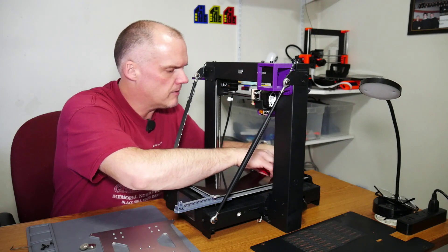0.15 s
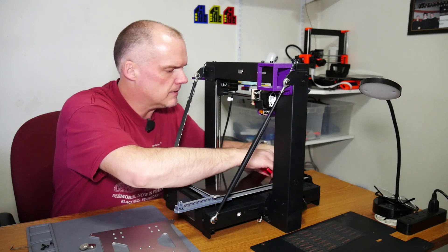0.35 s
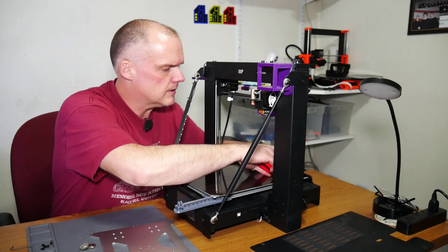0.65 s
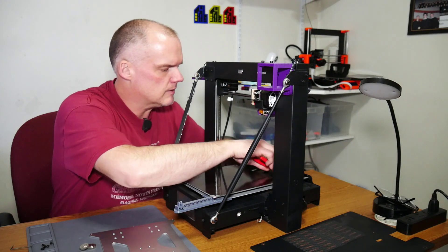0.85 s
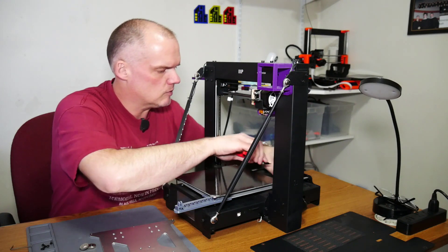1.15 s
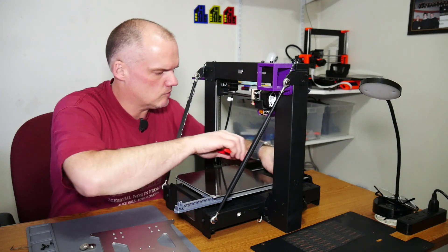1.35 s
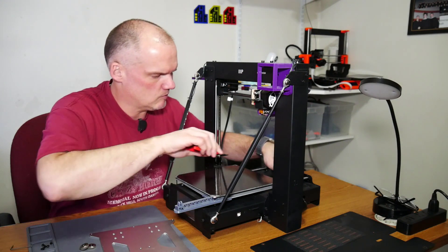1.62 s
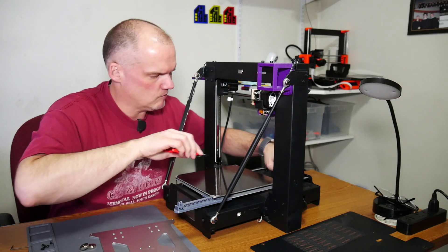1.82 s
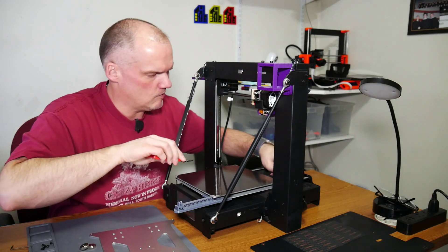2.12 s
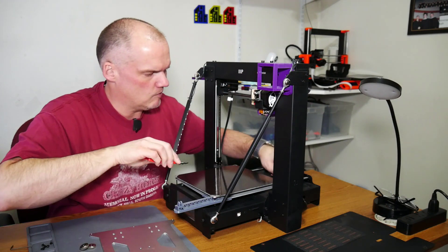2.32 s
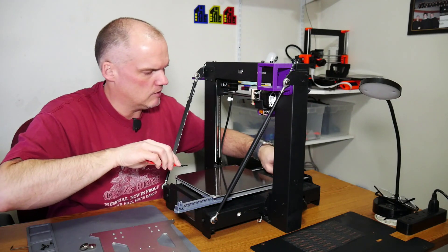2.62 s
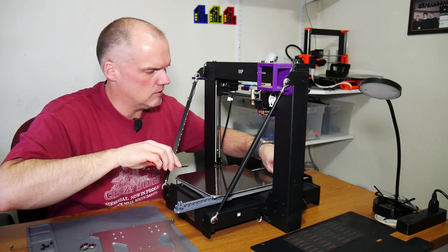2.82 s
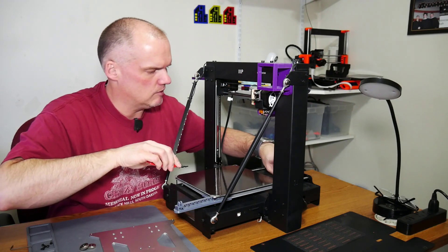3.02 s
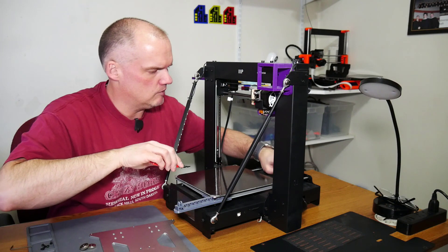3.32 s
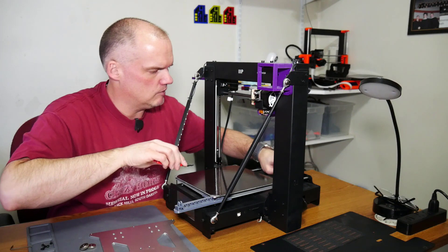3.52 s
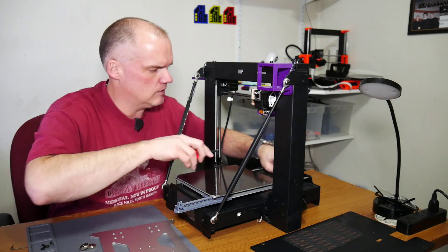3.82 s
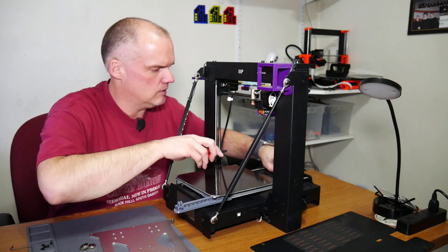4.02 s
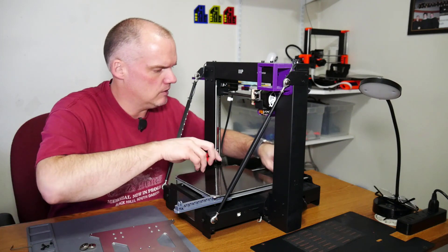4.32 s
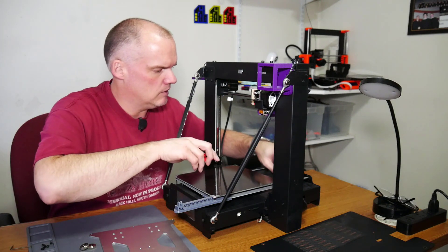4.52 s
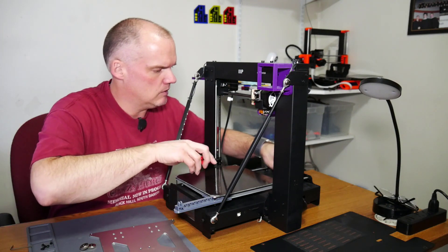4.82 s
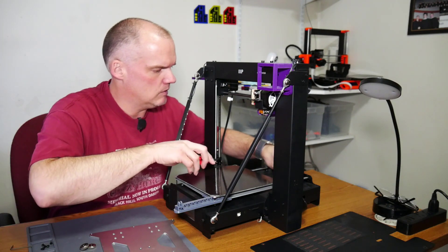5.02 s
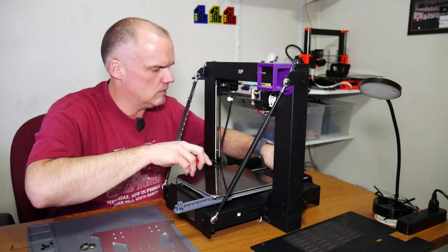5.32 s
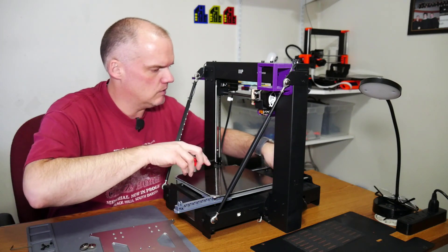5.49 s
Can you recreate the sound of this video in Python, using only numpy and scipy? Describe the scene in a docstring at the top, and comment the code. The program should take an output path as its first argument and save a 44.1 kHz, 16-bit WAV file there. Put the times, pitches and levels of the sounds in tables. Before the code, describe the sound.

Close lapel microphone in a small, quiet workroom. Faint hiss, low shirt rumble and tiny ticks lead to one loud, crisp cutter snap through a nylon tie at half a second, with a short ring from a metal frame. A few bright tool clicks follow, then much quieter wire rustling, soft bumps, small scrapes and sparse ticks to the end.

```python
"""Low cloth rumble, hiss, a soft rub and faint ticks; then flush cutters snap a nylon zip tie on a metal frame.
The snip is a pop, a jaw pulse and noise; decaying sines ring the frame and noise bands answer as the room.
Hands then work among wires: decaying noise bands make ticks and knocks, trains of tiny slips make scrapes
and rustle, short sines make squeaks and one ringing tap. A lapel microphone in a small workroom hears it,
with its shirt's rumble (shaped noise, slips, slow swings) and its own hiss (shaped noise)."""
import sys
import numpy as np
from scipy import signal
from scipy.fft import rfft, irfft
from scipy.io import wavfile

SR = 44100
rng = np.random.default_rng(int(sys.argv[2]) if len(sys.argv) > 2 else 0)


def materialize(psi):
    """Save the field psi as 16-bit PCM at rate SR to the path in sys.argv[1].

    A 1-D psi becomes a single channel; in a 2-D psi each row is a channel.
    """
    bounded = np.clip(np.atleast_2d(psi).T, -1, 1)
    quanta = np.round(bounded * 32767).astype(np.int16)
    wavfile.write(sys.argv[1], SR, quanta)


N = 249242
TIME_S = np.arange(N) / SR
RING_TIME_S = TIME_S[:SR * 3 // 5]  # time since a blow

SNIP_S = .4872
STROKE_ATTACK_S, STROKE_RELEASE_S = 0.024, 0.018  # release is a time constant
RESTING_DULL_DB, RESTING_DRY_DB = -70.5, -73.5  # hands never quite still; before the rub trims
HISS_DB = -62
TOP_HZ = 15900

# Levels in the tables are relative; the functions set the mix.
# Clatter of jaws and tie after the cut: band_hz, level_db
CLATTER_BANDS = [(130, -32), (300, -34), (700, -31), (1150, -30.5), (1700, -22.5), (2700, -22), (4000, -25),
                 (5200, -22), (6500, -19.5), (8200, -36), (10500, -28.5), (14000, -35.5)]
# Room's answer to the cut: band_hz, level_db, t60_s
ROOM_BANDS = [(128, -51, .45), (285, -40, 0.36), (699, -39.5, 0.36), (1150, -38.5, .3),
              (2010, -37.5, 0.303), (3000, -35.5, 0.27), (4297, -37, .3), (6018, -37, 0.279),
              (8730, -41.5, .28), (13000, -48, .28)]
# Modes of the metal frame: mode_hz, level_db, t60_s
FRAME_MODES = [(260.1, -6, 0.46), (295, -9.5, 0.14), (331, -4, 0.32), (412, -8, 0.21), (492.2, 2, .27),
               (628, 2, 0.27), (680, -11.5, 0.23), (711, 3.5, .1), (797, -6, 0.34), (873, -6, .15),
               (965.6, -1.5, 0.2), (1028, -3, 0.25), (1136, 3, 0.086), (1320, -13, .24), (1634, 1.5, 0.15),
               (1675, -4.5, .16), (2040, 0.5, 0.24), (2084, 2, 0.16), (2440, -14, 0.26),
               (2750, -12.5, 0.34), (2864, -6.5, 0.22), (3155, -14.5, .3), (3350, -15, .3),
               (3884, -11, 0.18), (4438, -2.5, 0.15), (4856, -3, .16), (5870, 0, 0.11)]
# Ticks of nylon, wire and tool: start_s, level_db, body_db, top_db, t60_s
TICK_EVENTS = [(0.413, -54, -8, -10, 0.023), (.428, -51, -23, -16, 0.03), (0.4442, -40, -16, -12, 0.03),
               (0.5712, -39, -1, -24, 0.024), (.5937, -20, -11, -23, 0.0078), (0.5959, -24, -8, -24, 0.019),
               (.7025, -51, -16, -21, .014), (0.7109, -33.5, -16, -13, 0.03), (1.199, -42, -9, -9.5, 0.022),
               (1.331, -56, -15, -12, 0.023), (1.6026, -43, -5, -13, 0.036),
               (1.859, -31, -13.5, -13, 0.012), (1.8664, -30, -9.5, -9, 0.027),
               (1.9428, -31.5, -6.5, -12, 0.012), (1.959, -48.5, -11, -8, 0.058),
               (2.179, -50.5, -3, -25, 0.046), (2.2321, -53, 4.5, -6, 0.025), (3.0477, -43, -4, -14, 0.013),
               (3.0933, -49, -16, -3.5, 0.023), (3.8255, -43.5, -3.5, -4.5, 0.028),
               (4.2908, -46, -5, -15.5, 0.069), (4.3147, -47.5, -1.5, -10, 0.028),
               (4.393, -56, 5.5, -17, 0.038), (4.775, -53, -5, -24, .035), (4.8774, -53.5, -14, -13, 0.035),
               (4.9879, -42, -4, -11, 0.043), (5.008, -58, 7, -19.5, 0.018), (5.1352, -48, 6, -25, 0.014)]
# Ring of a tick: band_hz, level_db
TICK_RING_BANDS = [(3200, -14.5), (4000, -15), (4800, -5), (5800, -6.5), (6900, -7.5)]
# Body of a tick: band_hz, level_db
TICK_BODY_BANDS = [(450, -11.5), (800, -8), (1300, -8.5), (2100, -6.5)]
# Top of a tick: band_hz, level_db
TICK_TOP_BANDS = [(8300, 1.5), (10500, -5), (13300, -9)]
# Soft bumps of fingers and wire bundles: start_s, level_db, t60_s
KNOCK_EVENTS = [(0.3818, -47.5, 0.036), (1.0415, -53.5, 0.025), (1.198, -59.5, 0.054), (1.7127, -50, 0.075),
                (3.046, -44, 0.044), (5.135, -45, 0.07), (5.518, -50.5, .04), (5.538, -47.5, 0.07)]
# Ring of a bump: band_hz, level_db
KNOCK_BANDS = [(330, -13.5), (520, -11), (850, -5), (1350, -9.5), (2000, -19.5)]
# Wires dragged over the frame: peak_s, level_db, rise_s, fall_s, treble_db (rise, fall: time constants)
SCRAPE_EVENTS = [(0.712, -44, 0.0095, 0.006, -21), (0.86, -60, 0.048, 0.068, 8),
                 (1.47, -56, 0.0072, 0.0054, -24), (2.194, -46.5, 0.0066, 0.02, -12),
                 (2.355, -56, 0.0034, 0.01, -2), (3.97, -59, 0.0097, 0.021, -4),
                 (4.475, -52.5, 0.017, 0.022, -1), (5.142, -47, 0.021, 0.022, -5),
                 (5.527, -38.5, 0.0081, 0.029, -2)]
# Spectrum of a scrape: freq_hz, level_db
SCRAPE_SPECTRUM = [(200, -11.5), (440, -17.5), (500, 11.5), (570, -29), (740, -4), (900, 3.5), (1400, -9),
                   (1950, -8), (2900, -19.5), (4250, -10), (5200, -15), (7000, -17), (9000, -29),
                   (14000, -38)]
# Strokes of hand and sleeve among wires: start_s, length_s, level_db, dry_over_dull_db
STROKE_EVENTS = [(0.171, 0.094, -61, -7), (.36, 0.054, -63, -9), (0.805, .15, -54, -11),
                 (1.015, 0.24, -61, -7.5), (1.317, 0.052, -58.5, -5.5), (1.436, .06, -61.5, -11),
                 (1.686, 0.066, -59, -2), (1.828, 0.14, -58, -1.5), (2.071, 0.26, -60.5, 0),
                 (2.529, 0.16, -64.5, 1.5), (2.737, .22, -62, -1), (2.944, 0.34, -61, -3.5),
                 (3.257, .17, -66, -0.5), (3.65, 0.097, -67, 0), (3.929, 0.13, -62, -1),
                 (4.139, 0.26, -63.5, 0.5), (4.409, 0.18, -61, -9), (4.709, 0.042, -57, -12),
                 (4.845, 0.052, -61.5, -2.5), (5.106, 0.12, -57.5, -7.5), (5.517, 0.1, -55.5, -6)]
# Spectrum of sleeves rubbing: freq_hz, level_db
DULL_RUB_SPECTRUM = [(180, -15), (262, -1.5), (350, -3.5), (440, -2), (500, 9), (560, -3), (640, -1),
                     (850, -5.5), (1200, -23.5), (3000, -49.5)]
# Spectrum of fingers on insulation: freq_hz, level_db
DRY_RUB_SPECTRUM = [(500, -48.5), (800, -1), (1050, 5.5), (1400, 0), (2000, -7), (2600, -13), (5000, -15),
                    (12000, -17.5)]
# Insulation squeaking on insulation: centre_s, level_db, pitch_hz, glide_hz_per_s, half_length_s
SQUEAK_EVENTS = [(3.522, -60.5, 2810, 12996, 0.0087), (4.914, -57.5, 6700, 0, 0.0055)]
# Level of the shirt's sway: time_s, level_db
SWAY_CURVE = [(0.0, -60.5), (0.58, -48.5), (0.69, -58.5), (2.09, -49.5), (2.6, -63), (2.85, -41.5),
              (2.91, -63), (2.99, -53), (3.76, -59.5), (3.79, -69), (4.19, -49.5), (4.26, -62), (4.85, -61),
              (4.88, -51.5), (5.4, -61.5), (5.46, -46.5), (5.49, -65.5), (5.65, -45)]
# Level of the cloth's flutter: time_s, level_db
FLUTTER_CURVE = [(0.0, -68.5), (0.44, -51.5), (0.71, -62.5), (0.94, -58), (2.12, -61), (2.42, -67),
                 (3.11, -60.5), (3.79, -69.5), (4.69, -68), (5.05, -65.5), (5.49, -68.5), (5.65, -71)]
# Soft tugs on the microphone: centre_s, level_db, pitch_hz
TUG_EVENTS = [(0.41, -38.5, 85), (1.0, -41, 120), (1.069, -42, 130), (1.436, -40.5, 111),
              (1.641, -40, 45.4), (2.108, -42, 42), (2.842, -37.5, 43), (3.122, -41, 37.8),
              (3.23, -45, 140), (3.449, -44.5, 34.7), (3.571, -43, 44.4), (5.452, -41, 55.4)]
# Spectrum of the hiss common to both channels: freq_hz, level_db
HISS_SPECTRUM = [(15, -33.5), (25, 0.5), (50, -5.5), (107, -10.5), (267, -9.5), (322, -19), (433, -15.5),
                 (495, -12), (582, -24), (970, -26), (2230, -23.5), (13200, -25), (15500, -28.5)]
# Spectrum of the hiss opposite in the two channels: freq_hz, level_db
SIDE_HISS_SPECTRUM = [(30, -5), (250, -3.5), (1000, -7), (3000, -11.5), (8000, -7.5), (14000, -7.5)]


def snip(ring, jaw_hz=5950, jaw_db=-3, jaw_s=0.00037, pop_db=-11, pop_s=0.00017,
         clatter_t60_s=0.03, frame_db=-31.0):
    """The tie parts with a pressure pop, the jaws slam shut, and frame and room ring on."""
    t = RING_TIME_S - .0007
    jaws = undb(jaw_db) * np.exp(-(t / jaw_s) ** 2 / 2) * np.cos(2 * np.pi * jaw_hz * t)
    pop = -undb(pop_db) * t / pop_s * np.exp((1 - (t / pop_s) ** 2) / 2)
    crack = burst([(2500, -17.5), (4200, -17.5), (9000, -16), (13000, -19)], 0.0054)
    out = np.zeros(N)
    add(out, SNIP_S, jaws + pop + crack)

    build = 1 - np.exp(-RING_TIME_S / .002)  # frame and walls answer a moment later
    clumps = catching(450, 5)[:len(RING_TIME_S)]
    room_t60_s = np.array(ROOM_BANDS)[:, 2]
    room = clumps * burst(ROOM_BANDS, room_t60_s)
    add(out, SNIP_S, build * (undb(frame_db) * ring + room))
    add(out, SNIP_S + .0018, burst(CLATTER_BANDS, clatter_t60_s))
    return out


def frame_ring():
    """A blow excites the frame's modes, each a decaying sine of random phase."""
    out = 0
    for hz, db, t60_s in FRAME_MODES:
        cycles = hz * RING_TIME_S + rng.random()
        out = out + undb(db) * fade(t60_s) * np.sin(2 * np.pi * cycles)
    return out


def ticks():
    """Short bright contacts ring in noise bands, each with its own share of body and top."""
    out = np.zeros(N)
    for start_s, db, body_db, top_db, t60_s in TICK_EVENTS:
        tick = burst(TICK_RING_BANDS, t60_s)
        tick = tick + undb(body_db) * burst(TICK_BODY_BANDS, 1.6 * t60_s)
        tick = tick + undb(top_db) * burst(TICK_TOP_BANDS, 0.83 * t60_s)
        add(out, start_s, undb(db) * tick)
    return out


def tap(start_s=4.989, tap_db=-50, hz=2030, rattle_db=8):
    """One tick catches the frame and leaves a short, rattling note, which a finger soon damps."""
    note = np.exp(-(RING_TIME_S / .022) ** 2) * np.sin(2 * np.pi * hz * RING_TIME_S)
    out = np.zeros(N)
    add(out, start_s, undb(tap_db) * note)
    return out * catching(400, rattle_db)


def knocks():
    """Soft contacts ring mostly low, in decaying noise bands."""
    out = np.zeros(N)
    for start_s, db, t60_s in KNOCK_EVENTS:
        add(out, start_s, undb(db) * burst(KNOCK_BANDS, t60_s))
    return out


def scrapes():
    """Each drag is a swell of friction slips with its own share of treble."""
    grain = colour(slips(4000, 1.9), SCRAPE_SPECTRUM) * catching(300, 5.3)
    dull = signal.sosfiltfilt(signal.butter(2, 2200, fs=SR, output="sos"), grain)
    treble = grain - dull
    out = np.zeros(N)
    for peak_s, db, rise_s, fall_s, treble_db in SCRAPE_EVENTS:
        swell = np.exp(-np.maximum((peak_s - TIME_S) / rise_s, (TIME_S - peak_s) / fall_s))
        out += undb(db) * swell * (dull + undb(treble_db) * treble)
    return out


def squeaks():
    """Two wires slide with brief, slightly rough whistles: gliding sines in a bell-shaped envelope."""
    out = np.zeros(N)
    for centre_s, db, hz, glide_hz_per_s, half_length_s in SQUEAK_EVENTS:
        t = TIME_S - centre_s
        whistle = np.sin(2 * np.pi * (hz + glide_hz_per_s * t / 2) * t)
        out += undb(db) * np.exp(-(t / half_length_s) ** 2) * whistle
    return out * catching(500, 7)


def rustle(dull_db=0.5, dry_db=0, catch_db=6.0):
    """Sleeves rub dully, fingers on insulation more dryly; both catch and slide together."""
    dull, dry = undb(RESTING_DULL_DB), undb(RESTING_DRY_DB)
    for start_s, length_s, db, dryness_db in STROKE_EVENTS:
        speed = undb(db) * stroke(start_s, length_s)
        dull = np.maximum(dull, speed)
        dry = np.maximum(dry, undb(dryness_db) * speed)
    rub = undb(dull_db) * dull * colour(slips(1500, 1.7), DULL_RUB_SPECTRUM)
    rub += undb(dry_db) * dry * colour(slips(1400, 2.6), DRY_RUB_SPECTRUM)
    return rub * catching(160, catch_db)


def stroke(start_s, length_s):
    """A hand gathers speed, slides, and comes to rest."""
    rise = np.clip((TIME_S - start_s) / STROKE_ATTACK_S, 0, 1)
    return rise * np.exp(-np.maximum(TIME_S - start_s - length_s, 0) / STROKE_RELEASE_S)


def shirt(sway_db=0, flutter_db=3, lurch_db=3):
    """Cloth sways in lurches, flutters by slips, and at times tugs the capsule through one slow swing."""
    sway = undb(np.interp(TIME_S, *np.transpose(SWAY_CURVE))) * catching(16, lurch_db)
    flutter = undb(np.interp(TIME_S, *np.transpose(FLUTTER_CURVE)))
    rumble = colour(rng.standard_normal(N),
                    [(10, -18.5), (24, -1.0), (40, 0.0), (62, -8), (100, -22), (300, -56)])
    flap = colour(slips(500, 4.1), [(50, -13.5), (110, 2.0), (170, 0), (280, -4.5), (400, -13.5),
                                    (1000, -41.5), (3000, -66.5)])
    out = undb(sway_db) * sway * rumble + undb(flutter_db) * flutter * flap
    for centre_s, db, hz in TUG_EVENTS:
        swing = np.pi * hz * (TIME_S - centre_s)
        out -= undb(db) * np.cos(2 * swing) * np.exp(-swing ** 2 / 4)
    return out


def slips(rate_hz, spread_db):
    """Friction: tiny slips of uneven size and either sign at random moments."""
    hits = rng.random(N) < rate_hz / SR
    size = undb(spread_db * np.minimum(rng.exponential(size=N), 4))
    return hits * rng.choice([-1, 1], N) * size


def catching(rate_hz, depth_db):
    """Uneven grain: a gain at rms 1 that moves between random levels about rate_hz times a second."""
    knots_s = np.cumsum(rng.exponential(1 / rate_hz, 4000))
    return unit(undb(depth_db * np.interp(TIME_S, knots_s, rng.uniform(-1, 1, len(knots_s)))))


def burst(points, t60_s):
    """Dense ringing after a blow: adjoining noise bands (band_hz, level_db) that die away."""
    hz, db = np.transpose(points)[:2]
    edges = np.sqrt(hz[1:] * hz[:-1])
    edges = np.r_[hz[0] ** 2 / edges[0], edges, hz[-1] ** 2 / edges[-1]]
    out = 0
    for lo, hi, gain, decay_s in zip(edges, edges[1:], undb(db), np.broadcast_to(t60_s, hz.shape)):
        shape = fade(decay_s)
        ring = band(rng.standard_normal(len(shape)) * shape, lo, hi)
        # equal energy whatever the bandwidth
        out = out + gain * ring * np.linalg.norm(shape) / np.linalg.norm(ring)
    return out


def fade(t60_s):
    """Exponential decay, 60 dB down after t60_s."""
    return np.exp(-np.log(1000) * RING_TIME_S / max(t60_s, 1e-3))


def colour(x, points):
    """Filter x by a (freq_hz, level_db) response, then scale to rms 1."""
    hz, db = np.transpose(points)
    freq_hz = np.maximum(np.fft.rfftfreq(N, 1 / SR), 1)
    gain = undb(np.interp(np.log(freq_hz), np.log(hz), db))
    return unit(irfft(rfft(x) * gain, N))


def band(x, lo_hz, hi_hz, order=3):
    """Causal band-pass."""
    edges_hz = [lo_hz, min(hi_hz, SR / 2 - 100)]
    return signal.sosfilt(signal.butter(order, edges_hz, "band", fs=SR, output="sos"), x)


def through(x, response):
    """Pass x through a response of unit energy."""
    return signal.fftconvolve(x, response / np.linalg.norm(response))[:N]


def undb(db):
    """Decibels to gain."""
    return 10 ** (np.asarray(db) / 20)


def unit(x):
    """Scale to rms 1."""
    return x / np.sqrt(np.mean(x ** 2))


def add(out, start_s, x):
    """Mix x into out from start_s."""
    i = max(int(start_s * SR), 0)
    out[i:i + len(x)] += x[:N - i]


def scene(frame_db=-28, room_db=-13, side_db=-73, width_db=-30):
    """Small contacts stir the frame and the room a little; the sound is all but mono."""
    ring = frame_ring()
    small = ticks() + knocks() + scrapes() + rustle() + squeaks() + tap()
    walls = burst([(300, -5.5), (1000, -4.0), (2500, 2.5), (5500, -2.5), (12000, 0.5)], 0.14)
    walls = walls * (RING_TIME_S > .005)
    sound = snip(ring) + small + shirt()
    sound += undb(frame_db) * through(small, ring) + undb(room_db) * through(small, walls)

    hiss = undb(HISS_DB) * colour(rng.standard_normal(N), HISS_SPECTRUM)
    side = undb(side_db) * colour(rng.standard_normal(N), SIDE_HISS_SPECTRUM)
    # slight stereo width: a quiet, delayed copy of the sound, opposite in the two channels
    add(side, .004, undb(width_db) * band(sound, 198.1, 16000))
    return sound + hiss + side * np.array([[1], [-1]])


def record(dry):
    """The recorder rounds off high peaks and cuts the top with a steep low-pass."""
    dry = dry / (1 + (dry / .8) ** 6) ** (1 / 6)
    return signal.sosfilt(signal.ellip(8, .2, 70, TOP_HZ, fs=SR, output="sos"), dry)


dry = scene()
out = record(dry)
materialize(out)
```